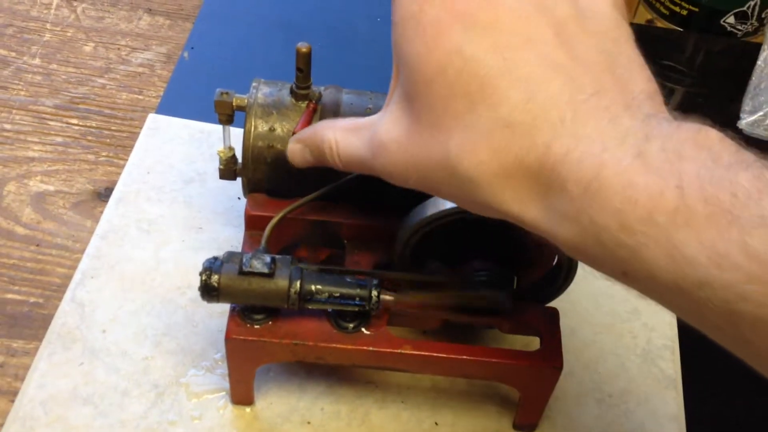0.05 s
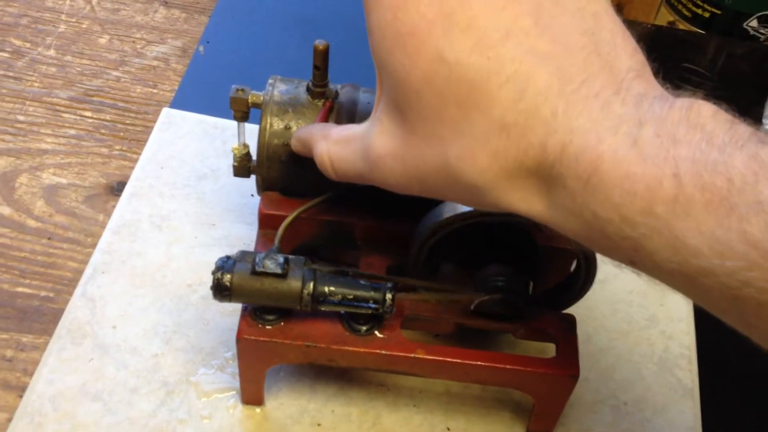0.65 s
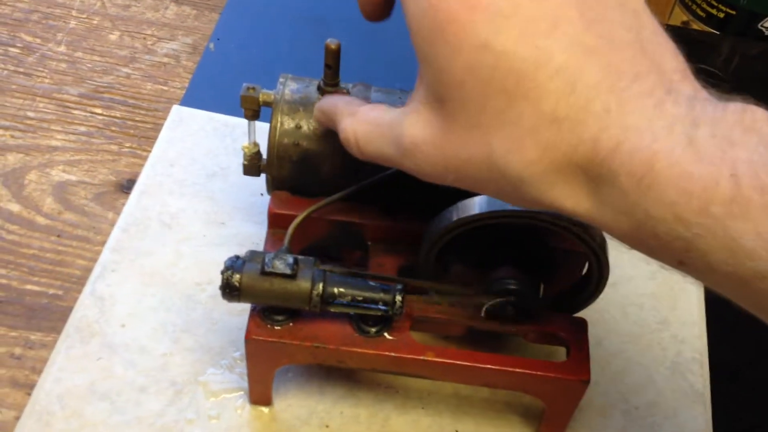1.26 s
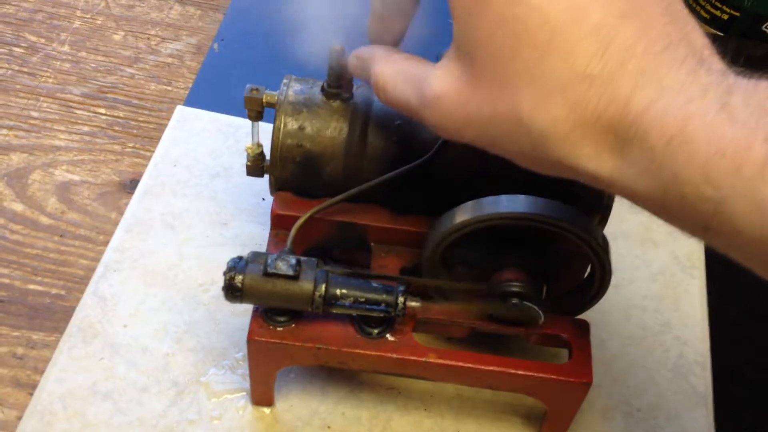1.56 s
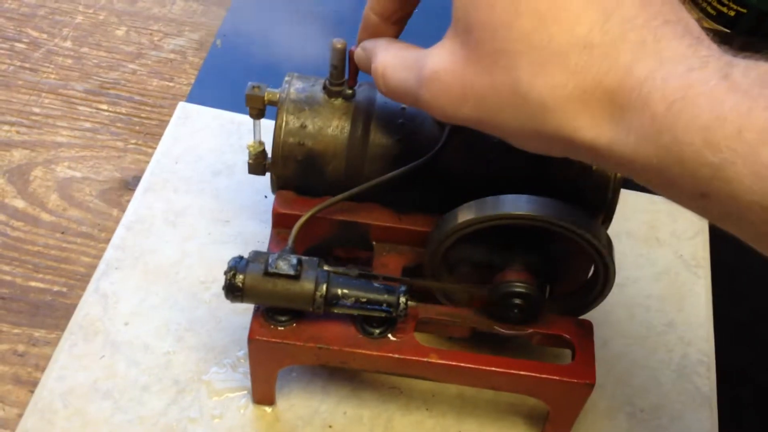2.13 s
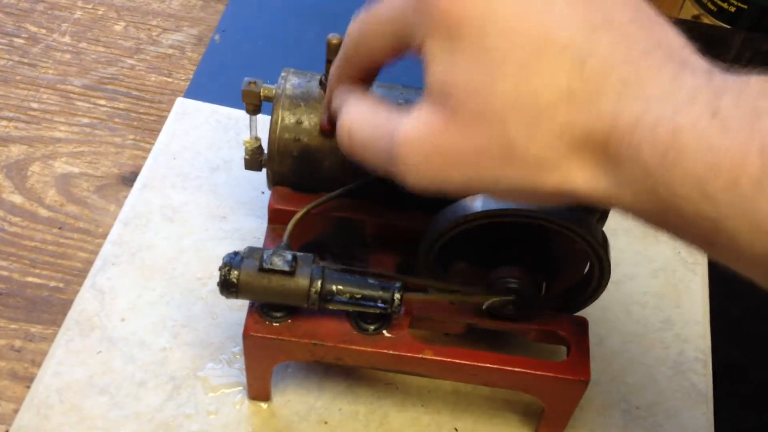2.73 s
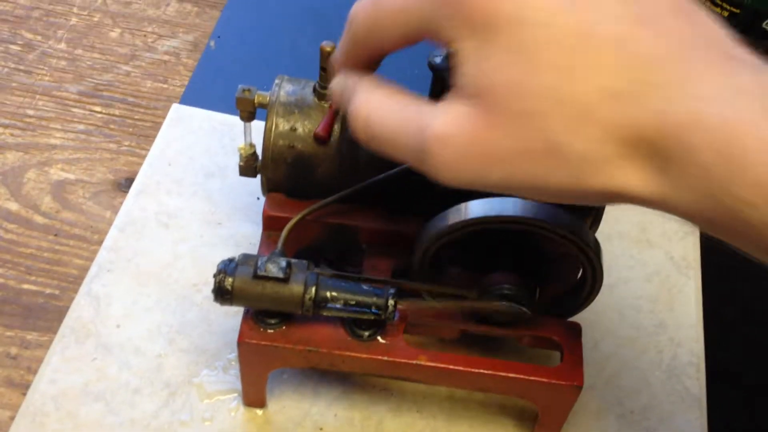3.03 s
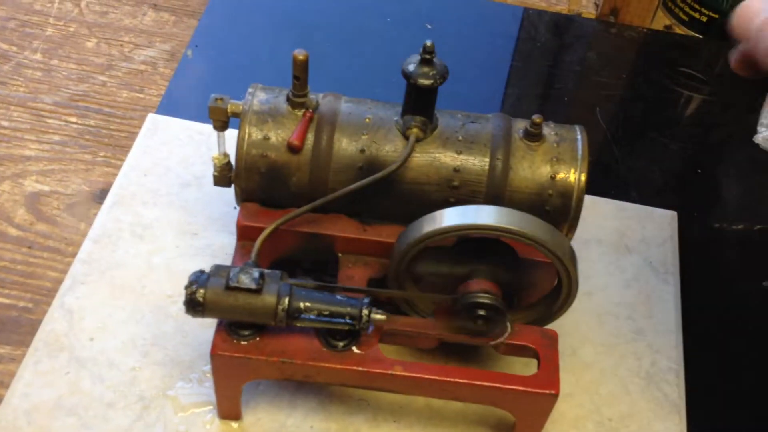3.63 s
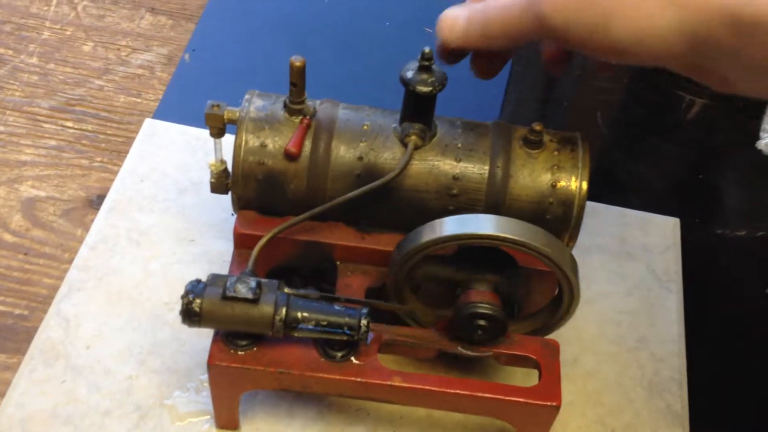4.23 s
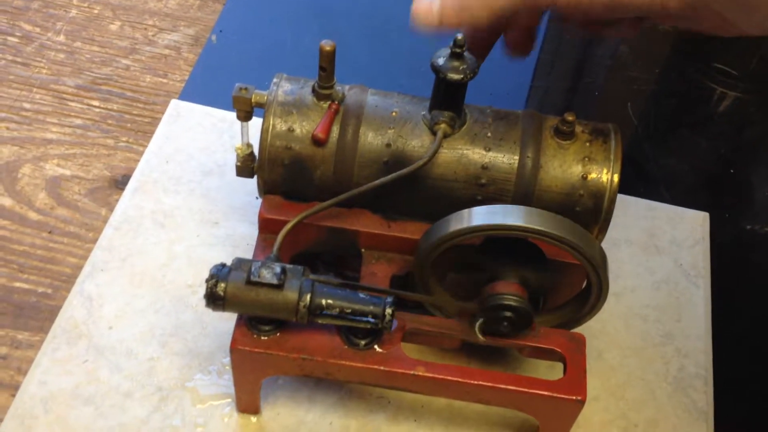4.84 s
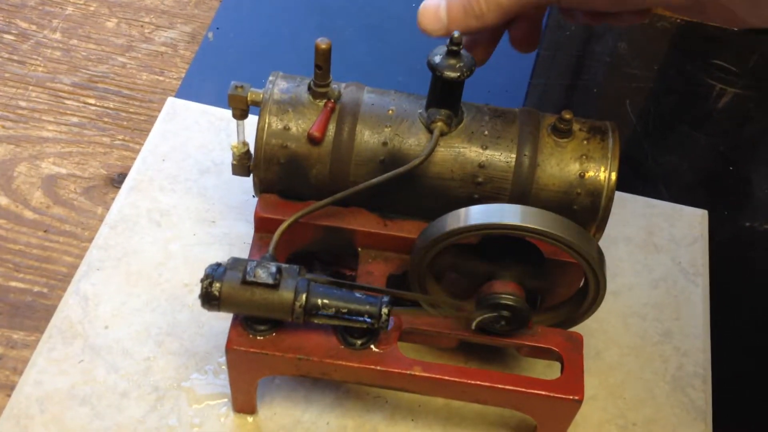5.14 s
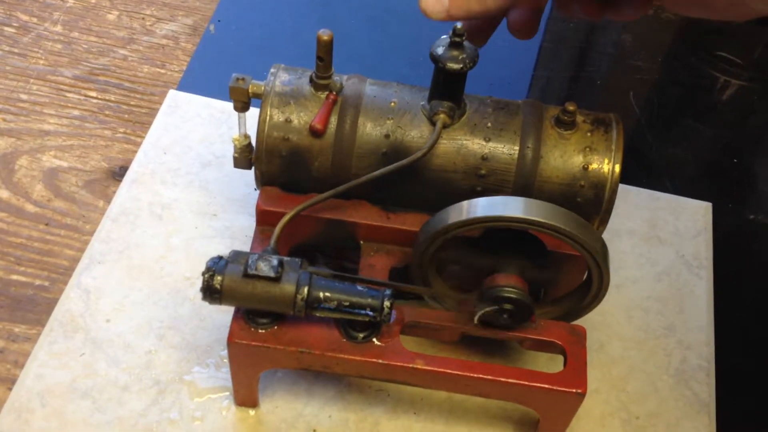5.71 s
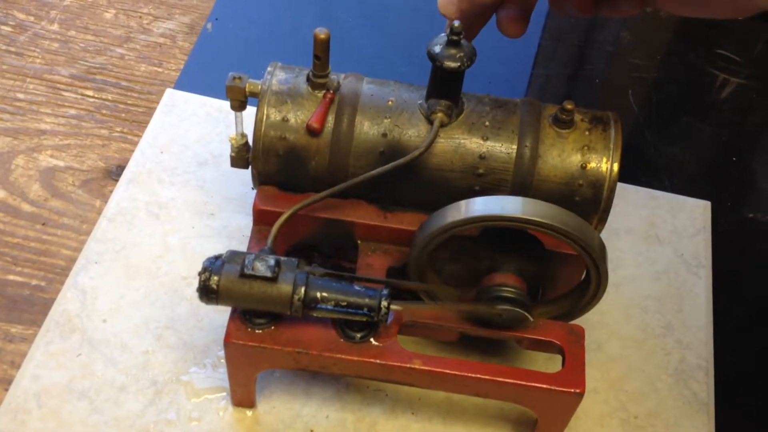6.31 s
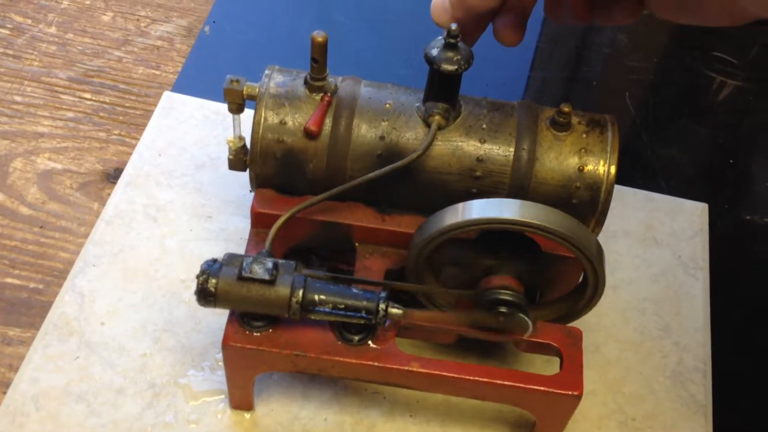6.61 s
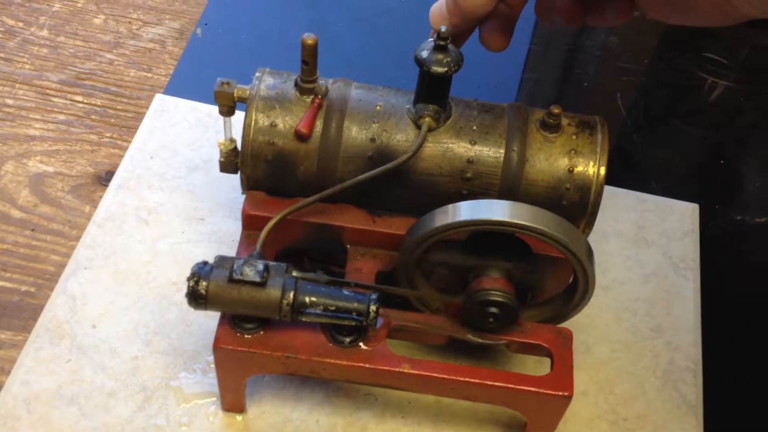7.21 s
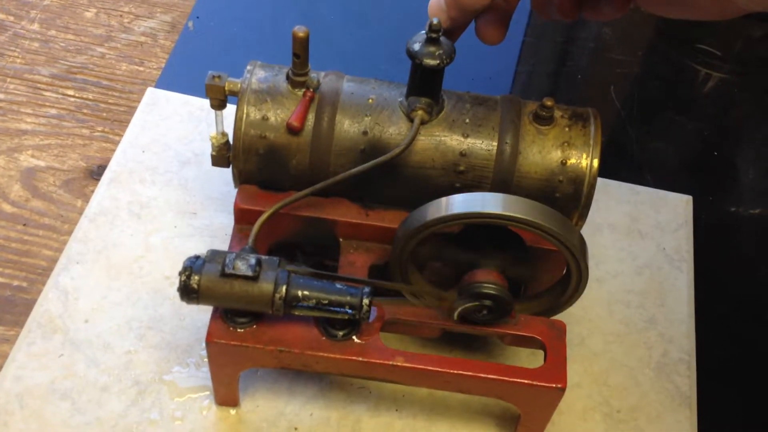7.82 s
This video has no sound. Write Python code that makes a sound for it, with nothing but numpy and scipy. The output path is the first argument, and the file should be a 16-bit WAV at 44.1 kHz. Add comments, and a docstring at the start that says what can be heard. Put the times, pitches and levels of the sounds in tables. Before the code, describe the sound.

A model steam engine runs close by on a table in a small room, its loose metal parts ticking, rattling and knocking about seven turns a second. Early on, a shrill steam whistle blows for about a second in a jet of hiss, rough at first and then cleaner. The engine clatters on steadily, with faint seething water, soft exhaust puffs and a low table rumble underneath.

```python
"""Indoors, on a table in a small room, a model steam engine runs at about seven turns a second.
Every turn its loose crank, valve, rod and piston tick and knock, ringing the frame and boiler.
A hand opens the boiler's whistle for a second: a rough, then cleaner, high note in a jet of steam.
Underneath, water seethes, the exhaust puffs, the bearings rub and the table rumbles."""
import sys
import numpy as np
from scipy import signal
from scipy.fft import rfft, irfft
from scipy.io import wavfile

SR = 44100
rng = np.random.default_rng(int(sys.argv[2]) if len(sys.argv) > 2 else 0)


def file_out(sig):
    """Save sig as 16-bit WAV at sys.argv[1]."""
    # one column per channel
    cols = np.atleast_2d(sig).T
    # limit, then scale
    lim = np.clip(cols, -1, 1)
    pcm = np.round(lim * 32767).astype(np.int16)
    wavfile.write(sys.argv[1], SR, pcm)


N = 351036
TIME = np.arange(N) / SR

# the flywheel's rotation, slowing as the whistle draws steam: (time [s], angle [turns])
FLYWHEEL = [(.003, 0), (.51, 4), (.892, 7), (1.404, 11), (1.51, 12), (1.903, 15), (2.301, 18), (2.707, 21),
            (3.265, 25), (3.829, 29), (4.54, 34), (5.535, 41), (6.525, 48), (7.364, 54), (8.056, 59)]
TURN_COUNT = 59
OPEN_S, WIDE_S, SHUT_S = 1.445, 1.912, 2.578  # the whistle's valve cracks open, opens wide, starts to shut


def crank():
    """The pin takes up its play each turn: it clicks, sets wheel and rod ringing, and rebounds."""
    # force of the pin: (time [s], click [dB], flywheel clank [dB], thin ring of the rod [dB])
    force = [(0, -38.5, -45, -60), (.26, -38.5, -42, -57), (.55, -39, -50, -57), (1.0, -46.5, -40, -46.5),
             (1.5, -45, -44.5, -72), (2.85, -43, -40.5, -62), (3.35, -58, -48, -49), (3.8, -59, -54, -56),
             (4.4, -54, -45, -58), (5.15, -47, -41.5, -55), (5.75, -60, -49, -59), (6.5, -48.5, -46, -72),
             (7.1, -47, -45, -67), (7.9, -47.5, -54, -63)]
    # tone of the click and of its rebound: (frequency [Hz], level [dB])
    click_colour = [(60, -60), (250, 13.5), (650, -15.5), (1100, 4.5), (1800, -25), (2800, 6.5),
                    (3400, -3.5), (3900, -9), (4500, 2), (5500, -11.5), (8500, -4.5), (10500, -19),
                    (12500, -11), (15000, -9)]
    rebound_colour = [(200, -24), (900, 1.5), (1800, 8), (3000, 4.5), (4500, -10), (5500, -9), (7200, 1),
                      (10000, -30), (15000, -40)]
    clicks, clanks, rings = (strikes(0, db) for db in per_turn(force, 0))
    click = amp(1.5) * blows(clicks, click_colour, contact_s=.003, buzz_db=-10, buzz_s=.012)
    clank = amp(3.5) * ring(clanks, hz=1860, t60=.033, spread=.0077, grain=.021)
    rod_ring = sum(amp(db) * ring(rings, hz, t60=.04, spread=.003, grain=grain)
                   for hz, db, grain in [(4440, 6, .02), (8560, 1, .01), (12160, 7, .003)])
    rebounds = strikes(0, db=-46) + [.0132, 0]  # about 13 ms after each click
    rebound = blows(rebounds, rebound_colour, contact_s=.0022, buzz_db=5, buzz_s=.01)
    return click + clank + rod_ring + rebound


def valve_gear():
    """The valve gear strikes the frame with one sharp tick a turn."""
    # timing and weight of the tick: (time [s], place in the turn [0-1], level [dB])
    ticks = [(.05, 0.62, -53), (.5, .533, -43), (1.202, .56, -46.5), (2.8, .545, -43), (3.35, .605, -42),
             (3.75, 0.61, -50), (4.9, 0.58, -42.5), (6.1, .625, -41), (7.2, 0.62, -43), (7.9, .6, -43)]
    # accented ticks: (time [s], level [dB])
    accents = [(3.206, -40), (3.490, -38), (4.485, -37.5), (4.770, -37.5), (5.061, -40), (5.338, -40),
               (5.485, -39.5), (5.767, -38.5), (6.188, -40.5), (6.332, -40.5), (6.612, -38), (6.754, -38),
               (7.032, -41), (7.31, -39), (7.724, -38.5)]
    # bright tone of the tick: (frequency [Hz], level [dB])
    colour = [(60, -29), (250, -5), (650, -20), (1100, -17.5), (1800, -7), (2800, 2.5), (3400, 1.5),
              (3900, -9), (4500, 1), (5500, -27), (8500, -5.5), (10500, -7), (12500, -5.5), (15000, -4.5)]
    place, db = per_turn(ticks, ticks[0][1])
    hits = strikes(place, db, slop_turns=.004, accents=accents)
    return amp(1) * blows(hits, colour, contact_s=.0035, buzz_db=-12, buzz_s=.008)


def connecting_rod():
    """The loose rod chatters once a turn, bounces, and scrapes mid-stroke."""
    # timing and weight of the chatter: (time [s], place in the turn [0-1], level [dB])
    chatter = [(0.049, 0.36, -42.5), (1.302, 0.27, -47), (2.748, 0.3, -47.5), (4.001, 0.32, -43.5),
               (4.3, 0.3, -50), (4.9, .345, -46), (6.1, 0.39, -45), (7.9, 0.31, -45.5)]
    # rattling tone of the rod: (frequency [Hz], level [dB])
    colour = [(60, -28), (250, -6), (650, -7.5), (1100, 0), (1800, -2), (2800, 9), (3400, -3.5),
              (3900, -3.5), (4500, 1.5), (5500, -20), (8500, -15), (10500, -11.5), (12500, -11.5),
              (15000, -8)]
    place, db = per_turn(chatter, chatter[0][1])
    hits = strikes(place, db, slop_turns=.016)
    bounces = strikes(place + .055, db - 2.5, slop_turns=.016)
    rattle = blows(np.vstack([hits, bounces]), colour, contact_s=.003, buzz_db=-14, buzz_s=.012)
    scrape_gain = amp(-47 + 2.9 * wander(270)) * stroke(centre=.42, width=.056)
    return rattle + scrape_gain * noise(colour, framed=.56)


def piston():
    """The piston knocks dully once a turn and scuffs along the bore, louder as the knock grows."""
    # timing and weight of the knock: (time [s], place in the turn [0-1], level [dB])
    knocks = [(.1, .76, -49), (.35, .738, -46), (.85, .74, -49), (1.6, 0.73, -42.5), (1.75, 0.7, -65),
              (2.7, 0.7, -66), (3.151, 0.81, -42.5), (3.55, .89, -43.5), (3.8, 0.89, -50),
              (4.45, .86, -47.5), (4.7, 0.9, -68), (5.8, 0.7, -62), (6.351, 0.8, -49), (7.05, 0.82, -43.5),
              (7.2, 0.83, -74), (7.9, 0.75, -48.5)]
    # accented knocks: (time [s], level [dB])
    accents = [(.477, -44), (.988, -42), (2.946, -40.5), (4.934, -45), (5.078, -44.5), (5.504, -43),
               (5.929, -41.5), (6.071, -44), (6.213, -46), (6.636, -42), (7.334, -42)]
    # dull tone of the piston: (frequency [Hz], level [dB])
    colour = [(60, -40), (200, -8), (400, -4), (550, -1), (800, 0), (1000, -5), (1250, -9), (1700, -3),
              (2800, -6), (3800, -15), (5500, -22), (9000, -28), (15000, -28)]
    place, db = per_turn(knocks, knocks[0][1])
    hits = strikes(place, db, slop_turns=.004, accents=accents)
    knock = amp(3) * blows(hits, colour, contact_s=.0058, buzz_db=-11, buzz_s=.015)
    _, knock_db = curves(knocks)
    scuff_gain = amp(knock_db - 3.5 + 5 * wander(150)) * stroke(centre=.93, width=.053)
    return knock + scuff_gain * noise(colour, framed=.75)


def whistle_valve():
    """The hand's valve shapes the note: returns pitch in Hz, gain and roughness from 0 to 1."""
    # strength of the note: (time [s], level [dB])
    strength = [(1.48, -13), (1.59, -16), (1.63, -18.5), (1.71, -16.5), (1.76, -19), (1.91, -18.5),
                (1.935, -15.5), (2.02, -12.5), (2.05, -16), (2.11, -14), (2.135, -14.5), (2.17, -12.5),
                (2.2, -20.5), (2.235, -12.5), (2.27, -21), (2.33, -16), (2.355, -12), (2.425, -13.5),
                (2.455, -18.5), (2.495, -14), (2.57, -14)]
    half_open_hz, wide_open_hz = 5004, 5140
    speak_s, ease_s = .022, .074  # the pipe is slow to catch the jet; the hand eases off before shutting
    db, = curves(strength)
    opened, wide, shut = ramp(OPEN_S + speak_s, .01), ramp(WIDE_S, .0193), ramp(SHUT_S, .075)
    scoop = 696 * np.exp(-np.maximum(TIME - OPEN_S, 0) / .014)  # rises into pitch
    overshoot = 139.6 * np.exp(-((TIME - WIDE_S) / .064) ** 2)  # jumps sharp as the valve opens wide
    pull = 4.5 * (db - np.mean(strength, axis=0)[1])  # flattens as it swells
    fall = 83 * ramp(SHUT_S - ease_s, ease_s) + 860 * shut  # sags, then drops as the steam is cut
    hz = half_open_hz - scoop + wide * (wide_open_hz - half_open_hz + overshoot - pull) - fall
    gain = amp(db - 35 * (1 - opened + shut)) * (opened > 0) * (shut < 1)
    rough = np.clip(.504 * (1 - wide) + .14 * wide + 2 * shut, 0, 1)
    return hz, gain, rough


def whistle():
    """Wet steam blows a short pipe: the note wobbles, throbs and flutters in a skirt of turbulence."""
    hz, gain, rough = whistle_valve()
    wobble_hz = 8 * wander(60) + (15 + 50 * rough) * wander(170)
    phase = 2 * np.pi * np.cumsum(hz + wobble_hz) / SR
    throb = .28 * (1 - rough) * np.tanh(2 * wander(45))
    flutter = 1 + throb + .25 * np.tanh(wander(130))
    skirt = unit(wander(190) + 1j * wander(130) + .44 * (wander(400) + 1j * wander(470)))
    breathiness = .08 + .65 * rough
    swing = flutter + breathiness * skirt
    swing /= (1 + (abs(swing) / 1.5) ** 4) ** (1 / 4)  # the pipe saturates, so its swells are bounded
    note = (np.exp(1j * phase) * swing).real
    octave = amp(-25 - 12 * rough) * (np.exp(2j * phase) * (flutter + .38 * skirt)).real
    return amp(-.74) * np.sqrt(2) * gain * (note + octave)


def steam_jet():
    """Steam rushes past the whistle's lip and sizzles with water; it leads the note and outlasts it."""
    # strength of the jet: (time [s], rush [dB], top sizzle [dB])
    strength = [(1.46, -42, -47), (1.512, -42, -40), (1.598, -41, -36), (1.72, -42, -44), (1.862, -42, -45),
                (1.964, -43, -32), (2.268, -42, -47), (2.446, -43, -41), (2.6, -43, -47)]
    # tone of the rush and of the sizzle: (frequency [Hz], level [dB])
    rush_colour = [(100, -53), (1500, -17.5), (3000, -5), (3700, -1), (4280, 7.5), (4520, 6), (5550, 8),
                   (5800, -1), (7200, 0.5), (7800, -4), (8700, -5), (10200, -1.5), (11700, -7),
                   (15000, -11.5)]
    sizzle_colour = [(7000, -34), (10500, -1), (12200, -1.5), (13500, 7), (15000, 5)]
    lead_s, lag_s, fade_db_per_s = .005, .025, 326
    rush_db, sizzle_db = curves(strength)
    rush = amp(rush_db + 8) * noise(rush_colour)
    sizzle = amp(sizzle_db + 1) * noise(sizzle_colour)
    flow = ramp(OPEN_S - lead_s, .024) * amp(-fade_db_per_s * np.maximum(TIME - SHUT_S - lag_s, 0))
    return (rush + sizzle) * amp(1.2 * wander(110)) * flow


def boiler():
    """Water seethes in the boiler, a low simmer broken by surges."""
    # the simmering bed and the peaks of its biggest surges: (time [s], level [dB])
    simmer = [(0, -49), (1.0, -57), (1.7, -55.5), (3.3, -57.5), (4.2, -65.5), (5.0, -58.5), (6.3, -58),
              (7.9, -57.5)]
    surges = [(.58, -41), (.99, -45), (1.2, -55), (1.39, -50), (2.08, -51), (2.29, -44.5), (2.75, -47),
              (3.64, -51), (4.7, -52.5), (6.08, -49.5), (6.471, -46.5)]
    # midrange tone of the seething: (frequency [Hz], level [dB])
    colour = [(300, -24.5), (700, -15), (950, -9), (1100, -0.5), (1380, 4.5), (1700, -7), (2300, -1.5),
              (3200, -13), (5000, -21)]
    simmer_db, = curves(simmer)
    boil = amp(simmer_db + 4.2 * wander(12)) + swells(surges, half_length_s=.038)
    return boil * amp(.42 * wander(120)) * noise(colour, framed=1)


def exhaust():
    """Steam leaves the cylinder in two soft puffs a turn, with a few longer wet spurts."""
    # the bed of hiss, in two stretches: (time [s], level [dB])
    hiss = [
        [(0.0, -57), (0.486, -59.5), (1.078, -58.5), (1.244, -60.5), (1.42, -60)],
        [(2.72, -60.5), (2.82, -59.5), (4.39, -63), (4.63, -57.5), (5.34, -56.5), (6.3, -58.5), (6.89, -54),
         (7.95, -60)],
    ]
    # peaks of the spurts: (time [s], level [dB])
    spurts = [(.15, -49), (4.99, -82), (5.39, -56), (5.55, -59), (6.1, -57), (6.53, -48.5), (6.73, -55),
              (7.14, -58), (7.51, -57.5)]
    # airy tone of the steam: (frequency [Hz], level [dB])
    colour = [(1000, -21), (3500, 3.5), (5500, 0), (7200, -0.5), (9500, 0.5), (11000, -4), (13000, -3),
              (15000, -1)]
    hiss_db, = curves(np.vstack(hiss))
    puffs = .88 + .33 * stroke(centre=.36, width=.055) + .38 * stroke(centre=.93, width=.11)
    flow = amp(hiss_db + 2.5 + 3.4 * wander(11)) * puffs + swells(spurts, half_length_s=.029)
    return flow * amp(wander(153)) * noise(colour)


def table_and_bearings():
    """The shaking engine keeps base plate and table rumbling and droning, while its bearings rub."""
    # the bed of steady running: (time [s], table rumble [dB], bearing rub [dB])
    running = [(0.0, -51.5, -46), (1.35, -52, -46), (1.99, -54, -49.5), (3.61, -52.5, -47),
               (3.94, -54.5, -47.5), (7.09, -53.5, -48.5), (7.4, -55, -47.5), (7.96, -54, -48)]
    # tone of the rumble and of the rub: (frequency [Hz], level [dB])
    rumble_colour = [(25, -44), (55, -50), (75, -21.5), (95, -14.5), (125, -9.5), (150, -4.5), (185, 0),
                     (250, -2), (310, -2.5), (400, -8.5), (600, -20), (1500, -59)]
    rub_colour = [(100, -52), (350, -3), (520, 3.5), (760, -1), (950, 3.5), (1100, 0.5), (1400, -1),
                  (2000, 0), (2700, -3.5), (3300, -9), (3900, -16.5), (4500, -7), (5300, -22),
                  (9000, -28.5)]
    # two narrow resonances of base plate and table: (frequency [Hz], width [Hz])
    resonances = [(250, 24), (442, 18)]
    rumble_db, rub_db = curves(running)
    low, high = (drone(hz, width) for hz, width in resonances)
    rumble = noise(rumble_colour, framed=.16) + amp(-10) * low + amp(-17) * high
    rub = noise(rub_colour, framed=.55) * (.81 + .28 * stroke(centre=.87, width=.104))
    return amp(rumble_db + 1 + .79 * wander(4.6)) * rumble + amp(rub_db - 2.5 + 1.94 * wander(47)) * rub


def room(sound, size=22050):
    """Sparse reflections from the table and walls, each band dying at its own speed."""
    # decay of the room: (frequency [Hz], time to fall 60 dB [s])
    decay = [(150, 0.16), (1000, 0.28), (5000, 0.17), (14000, 0.27)]
    taps = rng.standard_normal(size) * (rng.random(size) < 3000 / SR) * (np.arange(size) > .003 * SR)
    hz, t, bands = signal.stft(taps, SR, nperseg=256)
    tail = signal.istft(bands * amp(-60 * t / spectrum(decay, hz)[:, None]), SR)[1]
    return signal.fftconvolve(sound, tail / np.linalg.norm(tail))[:N]


def frame_db(hz):
    """The lift in dB that the ringing frame and boiler give at each frequency."""
    # resonances of frame and boiler: (frequency [Hz], width [Hz], lift [dB])
    resonances = [(230, 93, 3.5), (413, 18, 5.5), (666, 255, 9), (896, 42, 8), (1570, 350, 5.5),
                  (1840, 75, 3.5), (2363, 200, 5), (2735, 81, 5), (3080, 69, 7.5), (2930, 90, 4),
                  (3545, 153, 10), (4240, 270, 5), (4690, 100, 7), (7230, 200, 4), (8590, 180, 7.5),
                  (13100, 720, 6.5)]
    return sum(db / (1 + (2 * (hz - centre) / width) ** 2) for centre, width, db in resonances)


def body(colour, size=4096):
    """Minimum-phase response of a struck part on the frame, of energy 1."""
    hz = abs(np.fft.fftfreq(size, 1 / SR))
    log_gain = np.log(amp(spectrum(colour, hz) + frame_db(hz)))
    response = np.fft.ifft(np.exp(signal.hilbert(log_gain).conj())).real[:size // 2]
    return response / np.linalg.norm(response)


def blows(hits, colour, contact_s, buzz_db, buzz_s, size=2200):
    """Each hit is a brief hard contact and a longer buzz of loose metal, heard through the frame."""
    t, force = np.arange(size) / SR, np.zeros(N)
    span = .008 * SR  # a hit carries the energy of 8 ms at its level
    envelope = (np.exp(-t / contact_s) + amp(buzz_db) * np.exp(-t / buzz_s)) * (1 - np.exp(-t / .00035))
    for (s, db), grit in zip(hits, rng.standard_normal((len(hits), size))):
        chatter = grit * abs(grit) * envelope  # a few hard micro-impacts among many soft ones
        add(force, s, amp(db) * np.sqrt(span) * chatter / np.linalg.norm(chatter))
    return signal.oaconvolve(force, body(colour))[:N]


def ring(hits, hz, t60, spread, grain, size=5000):
    """Three close modes ring at every hit, detuned at random together (spread) and singly (grain)."""
    t, out = np.arange(size) / SR, np.zeros(N)
    for (s, db), chance in zip(hits, rng.standard_normal((len(hits), 4))):
        pitches = hz * (1 + spread * chance[0] + grain * chance[1:, None])
        modes = np.sin(2 * np.pi * pitches * t).sum(0) / np.sqrt(len(pitches))
        add(out, s, amp(db - 60 * t / t60) * (1 - np.exp(-t / .00069)) * modes)
    return out


def strikes(place, db, slop_turns=0, accents=()):
    """One slightly uneven hit a turn, as (time [s], level [dB]); an accent replaces the nearest hit."""
    late, louder = rng.standard_normal((TURN_COUNT, 2)).T
    hits = np.column_stack([passes(place + slop_turns * late), db + 1.2 * louder])
    for s, accent_db in accents:
        hits[np.argmin(abs(hits[:, 0] - s))] = s, accent_db
    return hits


def passes(place):
    """The times at which the flywheel passes a place in its turn."""
    s, turns = np.transpose(FLYWHEEL)
    return np.interp(np.arange(TURN_COUNT) + place, turns, s)


def per_turn(rows, place):
    """Every column of a timed table, read once a turn."""
    return curves(rows, passes(place))


def stroke(centre, width):
    """A swell in every turn; centre (after the crank's click) and width are in turns."""
    turns, = curves(FLYWHEEL)
    return np.exp((np.cos(2 * np.pi * (turns - centre)) - 1) / (2 * np.pi * width) ** 2)


def swells(peaks, half_length_s):
    """The gain of smooth swells that peak at (time [s], level [dB])."""
    return sum(amp(db) * np.exp(-((TIME - s) / half_length_s) ** 2) for s, db in peaks)


def drone(hz, width):
    """A narrow band of noise of rms 1: a resonance kept ringing by shaking."""
    shaking = wander(width / 2) + 1j * wander(width / 2)
    return unit((shaking * np.exp(2j * np.pi * hz * TIME)).real)


def noise(colour, framed=0):
    """Coloured noise of rms 1, tinted by the frame as far as it passes through it (0-1)."""
    hz = np.fft.rfftfreq(N, 1 / SR)
    gain = amp(spectrum(colour, hz) + framed * frame_db(hz))
    return unit(irfft(rfft(rng.standard_normal(N)) * gain, N))


def wander(hz):
    """Smooth random drift of rms 1, rolling off above hz."""
    f = np.fft.rfftfreq(N, 1 / SR)
    return unit(irfft(rfft(rng.standard_normal(N)) / (1 + (f / hz) ** 4), N))


def ramp(start_s, length_s):
    """A straight rise from 0 to 1."""
    return np.clip((TIME - start_s) / length_s, 0, 1)


def curves(rows, times=TIME):
    """Every column of a timed table, read at the given times."""
    s, *columns = np.transpose(rows)
    return [np.interp(times, s, column) for column in columns]


def spectrum(points, hz):
    """Joins points by straight lines over log frequency."""
    f, value = np.transpose(points)
    return np.interp(np.log(hz + 1), np.log(f + 1), value)


def add(mix, s, sound):
    """Mixes a sound in at time s."""
    part = mix[max(round(s * SR), 0):][:len(sound)]
    part += sound[:len(part)]


def amp(db):
    """Decibels to gain."""
    return 10 ** (np.asarray(db) / 20)


def unit(x):
    """Scales to rms 1."""
    return x / np.sqrt(np.mean(abs(x) ** 2) + 1e-20)


def scene():
    """Engine and whistle stand close by in a small room, the whistle with more reverb."""
    clatter = crank() + valve_gear() + connecting_rod() + piston()
    engine = clatter + boiler() + exhaust() + table_and_bearings()
    steam = whistle() + steam_jet()
    return (engine + steam + room(amp(-11) * engine + amp(-6.5) * steam))[None]


def record(dry):
    """The microphone's low cut and the recorder's band limit."""
    low_cut_hz, top_hz = 35, 15270
    lean = signal.sosfilt(signal.butter(2, low_cut_hz, "highpass", fs=SR, output="sos"), dry)
    band_limit = signal.firwin(801, top_hz, window=("kaiser", 8), fs=SR)
    return signal.oaconvolve(lean, band_limit[None], "same")


dry = scene()
out = record(dry)
file_out(out)
```